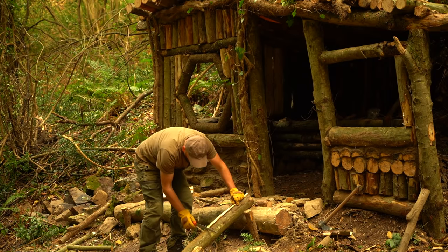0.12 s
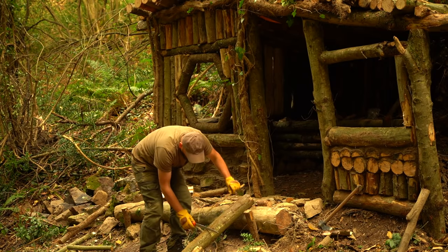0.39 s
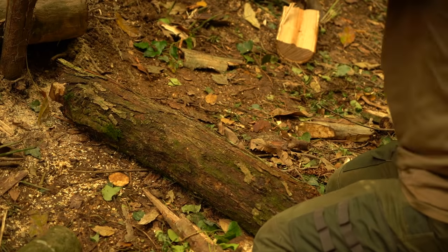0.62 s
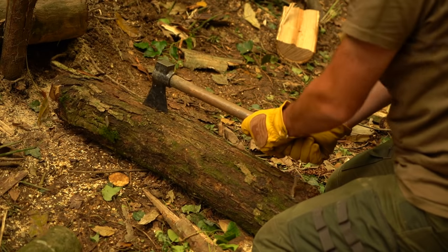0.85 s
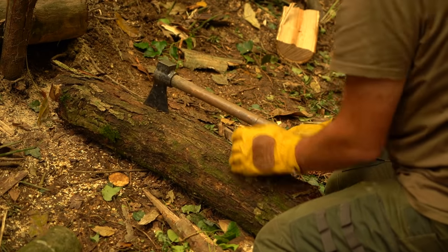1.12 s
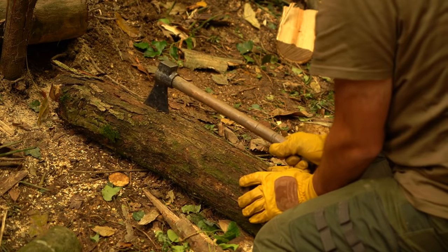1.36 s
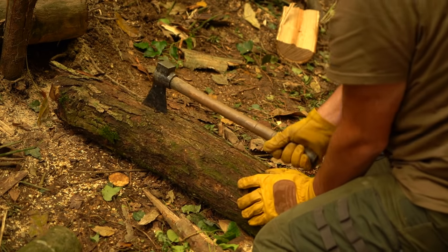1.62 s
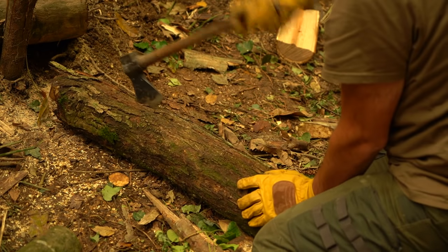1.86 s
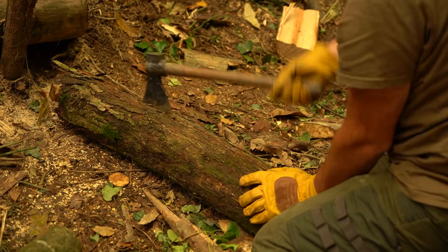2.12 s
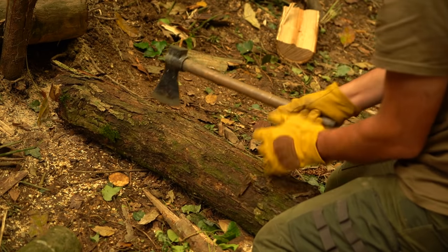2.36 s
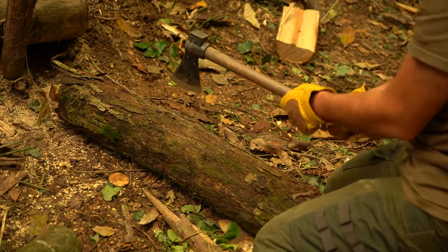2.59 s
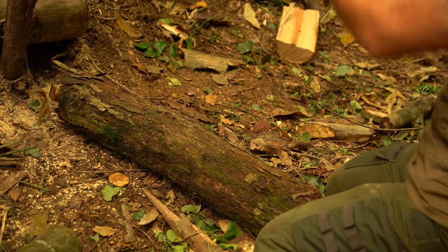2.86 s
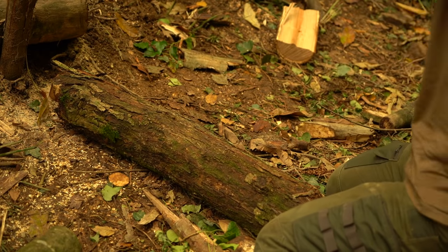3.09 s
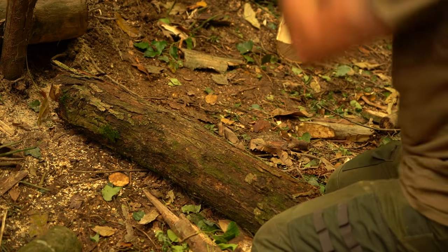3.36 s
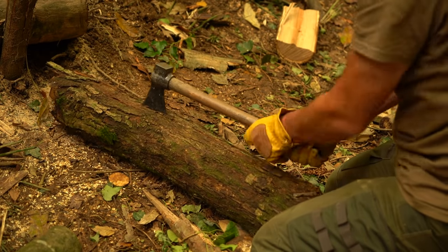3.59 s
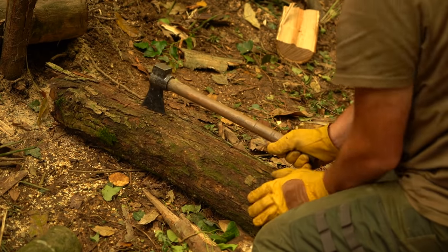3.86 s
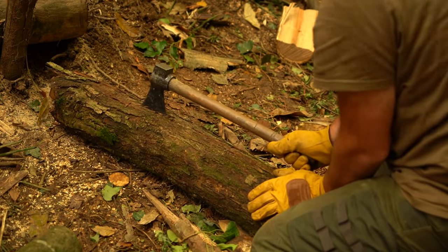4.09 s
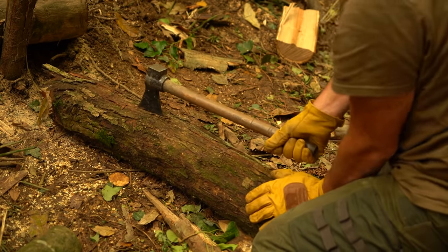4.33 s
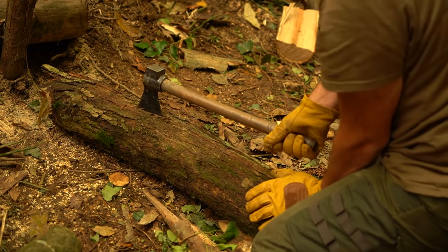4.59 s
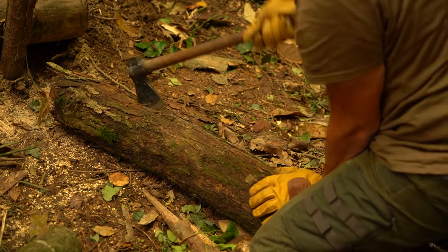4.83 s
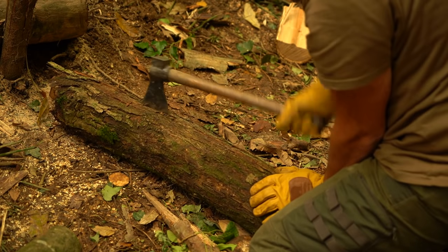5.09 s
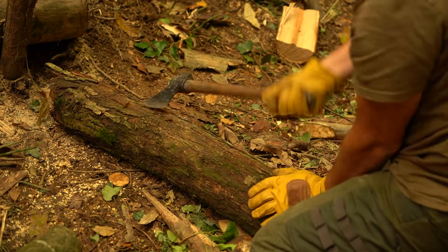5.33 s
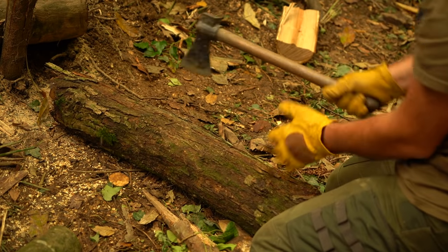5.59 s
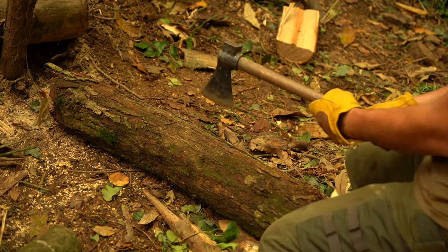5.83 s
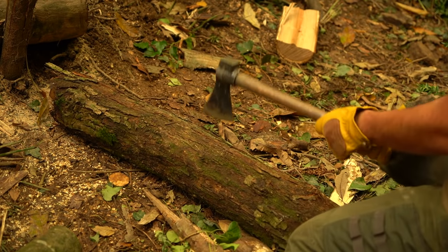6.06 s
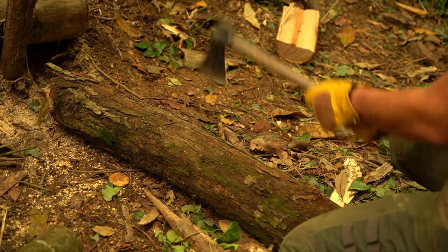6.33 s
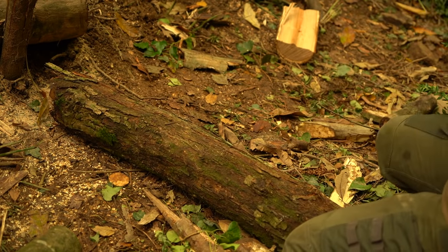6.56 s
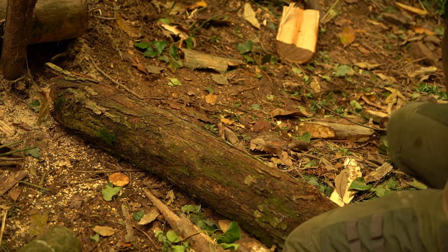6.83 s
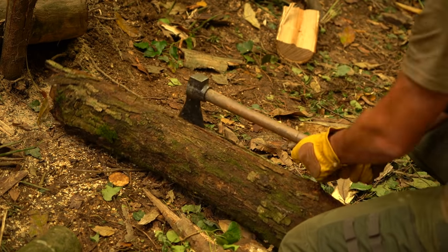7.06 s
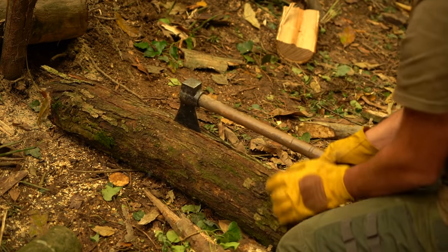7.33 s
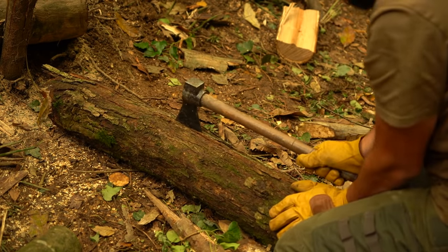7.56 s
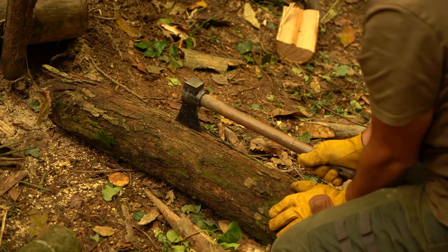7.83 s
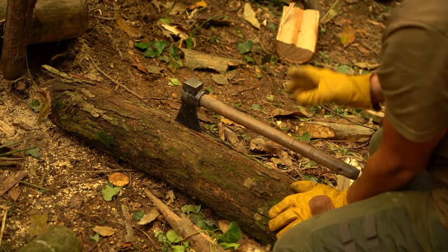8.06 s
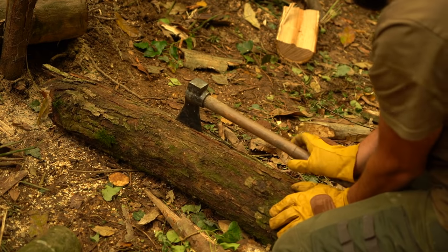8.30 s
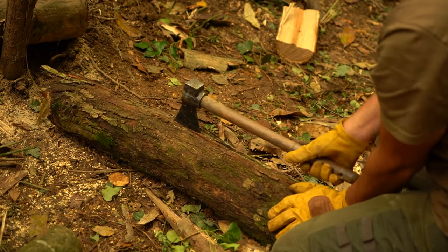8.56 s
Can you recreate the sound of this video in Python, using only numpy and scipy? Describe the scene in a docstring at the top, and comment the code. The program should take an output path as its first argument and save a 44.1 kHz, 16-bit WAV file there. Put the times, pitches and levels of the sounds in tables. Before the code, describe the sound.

A soft hush of leaves, then a heavy chop into wood with a diffuse forest echo. Small ticks and creaky snaps follow while the hatchet is loosened, amid rustling fabric and leaves. A second, more resonant chop comes, then a burst of hard knocks, then a third, drier and crack-like blow, ending with sharp knocks. Recorded close outdoors on a small, bass-thin stereo microphone with faint low rumbles.

```python
"""Three hatchet blows into a log in woodland, close to a small stereo microphone.
Each blow is a bright bite, a splitting crack and the log's ring; the trees answer with scattered noise.
Between blows the blade is worked loose: short ringing snaps and knocks, and gritty rubs of gloves.
Clothes and leaves rustle as noise that swells with the movements, over a soft hush of far leaves and air.
Low bumps and a faint rumble are band-shaped noise at the microphone."""
import sys
import numpy as np
from scipy import signal
from scipy.io import wavfile
from scipy.ndimage import uniform_filter1d

SR = 44100
rng = np.random.default_rng(int(sys.argv[2]) if len(sys.argv) > 2 else 0)


def decibels_to_gain(level_db):
    """Convert a level in decibels to a linear amplitude gain (20 dB per decade)."""
    exponent = np.asarray(level_db, float) / 20
    return 10 ** exponent


def store_wav(level_fs):
    """Save 16-bit WAV to argv[1]."""
    pcm = np.round(np.clip(np.atleast_2d(level_fs), -1, 1) * 32767)
    wavfile.write(sys.argv[1], SR, pcm.T.astype(np.int16))


N = 382788


def evened(x):
    """Scales to rms 1."""
    return x / np.sqrt(np.mean(x ** 2) + 1e-20)


def read(points, hz, axis=1):
    """Reads one column of a table along log frequency."""
    table = np.transpose(points)
    return np.interp(np.log(hz + 1), np.log(table[0] + 1), table[axis])


def add(mix, start_s, sound):
    """Mixes a stereo sound in at start_s."""
    part = mix[:, round(start_s * SR):][:, :sound.shape[1]]
    part += sound[:, :part.shape[1]]


def coloured(x, points, bright_db):
    """Minimum-phase filter with the given spectrum, tilted by bright_db per octave around 2 kHz."""
    hz = abs(np.fft.fftfreq(2048, 1 / SR))
    gain_db = read(points, hz) + bright_db * np.log2(hz / 2000 + .1)
    log_gain = np.log(decibels_to_gain(gain_db))
    taps = np.fft.ifft(np.exp(np.conj(signal.hilbert(log_gain)))).real[:512]
    return np.convolve(x, taps)[:len(x)]


# How alike the two channels hear sound from all around: [freq_hz, likeness (1 = identical)]
STEREO_LIKENESS = [(60, 0.95), (180, 1), (550, 0.79), (1650, 0.27), (4970, -0.1), (15000, 0.11)]
# Level of the left channel over the right: [freq_hz, left_over_right_db]
STEREO_LEAN = [(60, -0.5), (240, 0.5), (950, -2), (3770, -1.5), (15000, -4)]


def diffuse(field_db, size, count):
    """Stereo noise from all around, count samples; field_db(hz, s) shapes its short-time spectra."""
    hop = size // 4
    hz = np.fft.rfftfreq(size, 1 / SR)[:, None]
    s = np.arange(count // hop + 5) * hop / SR
    a, b, c, d = rng.standard_normal((len(s), len(hz), 4)).T
    left, other = a + 1j * b, c + 1j * d
    same = np.clip(read(STEREO_LIKENESS, hz), -1, 1)
    right = same * left + np.sqrt(1 - same ** 2) * other
    lean = decibels_to_gain(read(STEREO_LEAN, hz) / 2)
    spectra = np.array([left * lean, right / lean]) * decibels_to_gain(field_db(hz, s))
    return signal.istft(spectra, nperseg=size, noverlap=size - hop)[1][:, :count]


def patches(hz, s, wide, long):
    """Random unevenness over frequency and time (wide bins, long frames), rms 1."""
    field = rng.standard_normal((len(s), len(hz))).T
    over_hz = uniform_filter1d(field, wide, 0)
    return evened(uniform_filter1d(over_hz, long, 1))


def swells(s, peak_s, peak_db, rise_s, fall_s):
    """Power of each swell: 12 dB of straight climb over rise_s, 12 dB of straight drop per fall_s."""
    late = s - peak_s[:, None]
    slope = np.maximum(late / fall_s[:, None], -late / rise_s[:, None])
    return decibels_to_gain(peak_db[:, None] - 12 * slope) ** 2


# Spectrum of the distant leaves and air: [freq_hz, level_db per Hz]
HUSH_COLOUR = [(18, -61), (30, -22.5), (235, -28.5), (480, -4), (713, -2.5), (835, -2), (1270, 0),
               (1380, -1.5), (5590, -6.5), (10000, -11.5), (15200, -18), (16500, -36)]
# Its loudness, with one brief dip and then a slow rise: [time_s, level_db]
HUSH_LOUDNESS = [(0, -58), (.518, -60.5), (.527, -72), (.54, -58), (8.68, -56)]


def hush():
    """Far leaves and air: smooth noise with slow patches."""
    def field(hz, s):
        return read(HUSH_COLOUR, hz) + 0.6 * patches(hz, s, wide=14, long=14)

    level_db = np.interp(np.arange(N) / SR, *np.transpose(HUSH_LOUDNESS))
    return evened(diffuse(field, size=1024, count=N)) * decibels_to_gain(level_db)


SETTLE_S = 0.53  # the rustle enters here and the rumble's floor rises
# Low bumps at the microphone: [peak_s, rumble_db, thud_db, fall_s]
LOW_BUMPS = [(.58, -85, -101, .2), (.82, -70.5, -56, .12), (1.16, -71, -65, 0.19), (1.4, -81, -58.5, 0.2),
             (2.4, -99, -79, 0.4), (3.52, -71, -58, 0.13), (4.33, -103, -88.5, .8),
             (5.41, -92, -60.5, 0.039), (5.97, -93, -80.5, 0.73), (7.1, -77.5, -63, 0.13),
             (8.29, -80, -64, .04), (8.67, -89, -92, .15)]


def rumble():
    """Low, nearly mono noise around 60 Hz, and hollow thuds through the ground near 330 Hz."""
    peak_s, rumble_db, thud_db, fall_s = np.transpose(LOW_BUMPS)
    frames, out = np.arange(0, N, 128) / SR, np.zeros((2, N))
    rumble_floor_db = -100 - 8 * (frames < SETTLE_S)
    layers = [(60, 24, rumble_db, rumble_floor_db), (330, 11, thud_db, -91.5)]
    for centre_hz, narrow_db, peak_db, floor_db in layers:
        def field(hz, s):
            return -narrow_db * np.log2(hz / centre_hz + 0.0025) ** 2

        sound = diffuse(field, size=2048, count=N)
        bumps = swells(frames, peak_s, peak_db, 0.37 * fall_s, fall_s).sum(0)  # rises faster than it falls
        power = bumps + decibels_to_gain(floor_db) ** 2
        out += evened(sound) * np.interp(np.arange(N) / SR, frames, np.sqrt(power))
    return out


# Movements that stir clothes, gloves and leaves:
# [peak_s, peak_db, rise_s, fall_s, bright_db per octave around 1500 Hz]
MOVEMENTS = [(.72, -52.5, .3, .3, -0.5), (1.19, -48, .6, 0.35, -3), (1.304, -43.5, 0.064, 0.029, 0.5),
             (1.62, -53, 0.36, 0.35, -4.5), (1.86, -53, 0.16, 0.19, 11), (2.239, -57, 0.19, 0.16, 20),
             (2.38, -45.5, 0.12, 0.077, 0.5), (2.62, -47.5, 0.87, 0.47, -3.5),
             (3.19, -52.5, 0.4, 0.22, 0.5), (3.47, -45.5, 0.13, 0.4, 1), (3.935, -41.5, 0.053, 0.12, -1),
             (4.37, -52, 0.23, 0.48, 1.5), (4.83, -47, 0.11, 0.23, 2.5), (5.19, -48, 0.071, 0.066, 3.5),
             (5.34, -43, 0.063, 0.17, 3.5), (5.55, -54.5, 0.09, .1, -1), (5.649, -42, 0.075, 0.028, 3.5),
             (5.77, -48, 0.05, 0.1, 1.6), (6.025, -44, 0.17, 0.19, 0.9), (6.22, -49, 0.042, 0.11, 1.5),
             (6.715, -50.5, 0.24, 0.14, -0.3), (7.03, -46.5, 0.1, 0.54, 1.5), (7.42, -46, 0.35, 0.3, 0),
             (8.05, -54.5, 0.088, 0.05, 1.5), (8.281, -43.5, 0.0088, 0.12, 1),
             (8.6, -50, 0.073, 0.075, 3.5)]
# Spectrum of the rustling before that tilt: [freq_hz, level_db per Hz]
RUSTLE_SPECTRUM = [(59, -63), (100, -35), (135, -28), (166, -58), (471, -11), (1420, -3.5), (3780, -9.5),
                   (6290, -13), (16000, -30.5)]
# Spectrum of small breaks, for the crackle here and the snaps below: [freq_hz, level_db per Hz]
SNAP_COLOUR = [(120, -58), (200, -35.5), (671, -9.5), (2610, -0.5), (3250, -4.5), (3560, -5), (8580, -16.5),
               (14900, -30), (16000, -71)]


def rustle():
    """Uneven noise that follows the movements, with fine crackle of random grains riding on it."""
    peak_s, peak_db, rise_s, fall_s, bright_db = np.transpose(MOVEMENTS)
    frames = np.arange(0, N, 128) / SR
    power = swells(frames, peak_s, peak_db, rise_s, fall_s)
    total = power.sum(0)
    brightness_db = bright_db @ power / total  # the brightness is the power-weighted mean of all the movements

    def field(hz, s):
        """Colour, brightness and flicker."""
        tilt_db = np.interp(s, frames, brightness_db) * np.log2(np.maximum(hz / 1500, .6))
        flicker_db = 1.4 * patches(hz[:1], s, wide=1, long=3) + 1.63 * patches(hz, s, wide=12, long=12)
        return read(RUSTLE_SPECTRUM, hz) + tilt_db + flicker_db

    grain_db = 5.4 * np.minimum(rng.exponential(1, (2, N)), 5)
    grains = decibels_to_gain(grain_db) * (rng.random((2, N)) < 350 / SR)  # about 350 a second in each channel
    grains = grains + 0.17 * grains[::-1]  # a little of each in the other channel
    grain_shape = coloured(np.r_[1., np.zeros(300)], SNAP_COLOUR, .1)
    crackle = signal.oaconvolve(grains, grain_shape[None], axes=1)[:, :N]
    sound = evened(diffuse(field, size=256, count=N)) + decibels_to_gain(-10.5) * evened(crackle)
    envelope = np.sqrt(total) * (frames > SETTLE_S)
    return sound * np.interp(np.arange(N) / SR, frames, envelope)


# Snaps and knocks of blade, handle and bark, close by (relative levels; t60 is held to 0.004-0.12 s):
# [start_s, level_db, ring_hz, t60_s, bright_db per octave]
SNAP_EVENTS = [(0.723, -32, 1260, 0.017, -0.5), (1.199, -23, 1610, 0.019, 10),
               (1.225, -30, 6400, 0.021, 15), (1.263, -24, 2200, 0.017, 2.5),
               (1.296, -28, 1660, 0.062, -1.5), (1.461, -37.5, 1890, 0.032, 2.5),
               (1.511, -39.5, 1065, 0.022, 8), (1.725, -40, 3030, 0.023, 7.5),
               (1.781, -38.5, 2500, 0.041, 4.5), (1.808, -37.5, 1850, 0.14, 0), (1.824, -32, 1800, 0.02, 4),
               (1.8373, -22, 6370, 0.023, 7), (1.862, -32.5, 3080, 0.04, -2),
               (1.879, -33, 2770, 0.048, 2.5), (2.373, -31.5, 6100, 0.05, 6),
               (3.437, -32.5, 2000, 0.084, 1), (3.479, -25.5, 1150, 0.015, 1),
               (3.923, -30, 1430, 0.042, 1.8), (4.376, -34, 2880, 0.035, 2), (4.463, -35, 1920, 0.015, 5),
               (4.508, -36.5, 3530, 0.021, 3), (4.547, -34, 4560, 0.012, 2),
               (4.553, -28.5, 4290, 0.01, 1.5), (4.562, -33, 2040, 0.041, 3), (4.61, -37, 3250, 0.02, 6.5),
               (4.752, -37.5, 1940, 0.034, 3.5), (4.802, -31, 1740, 0.048, 4),
               (4.854, -16.5, 2130, 0.029, -1), (5.292, -32, 1720, 0.1, 1.5), (5.3103, -30, 2130, 0.031, 0),
               (5.32, -22.5, 3670, 0.033, 2.5), (5.3288, -13, 7360, 0.013, 7.5),
               (5.335, -17, 6000, 0.02, 4), (5.339, -10.5, 2840, 0.044, 3.5), (5.391, -33, 6000, 0.023, 6),
               (5.402, -13.5, 1720, 0.03, 2.5), (5.407, -17.5, 2330, 0.053, 0.8),
               (5.707, -35, 1940, 0.033, -3.5), (5.761, -29.5, 1950, 0.054, -0.2),
               (5.843, -37.5, 2060, 0.075, 5), (6.165, -38, 4000, 0.015, 5), (6.2, -29, 2600, 0.043, 1),
               (6.207, -19, 1760, 0.026, 1), (6.352, -36.5, 2520, 0.025, -3.5),
               (6.375, -41, 2090, 0.03, -4), (6.392, -38.5, 2160, 0.04, -2.5),
               (7.475, -28, 1874, 0.093, -1.2), (7.486, -37, 2300, 0.03, 2.5),
               (7.716, -29, 2720, 0.027, -2.8), (7.851, -33, 1580, 0.031, -5),
               (8.273, -9, 1710, 0.023, -5.5), (8.275, -10.5, 1790, 0.011, 3.2),
               (8.283, -8.5, 2100, 0.042, -3), (8.304, -23, 3000, 0.026, 1), (8.323, -31, 3060, 0.033, 2),
               (8.591, -30, 1940, 0.07, -1.5), (8.671, -9.5, 1810, 0.019, 2.5)]


def snap(db, hz, t60, bright_db):
    """A sharp tick, a splintery tail, and the small ring of whatever gave way."""
    t = np.arange(4096) / SR
    fade = decibels_to_gain(-60 * t / np.clip(t60, .004, .12))
    grit = decibels_to_gain(2.76 * np.repeat(rng.standard_normal(len(t) // 32), 32))  # it breaks unevenly
    splinters = rng.standard_normal((2, len(t))) * fade * grit
    splinters[1] = 0.62 * splinters[0] + 0.41 * splinters[1]
    splinters[:, :10] *= 1.8  # the first tick
    wide = np.array([coloured(v, SNAP_COLOUR, bright_db) for v in splinters])
    wide = wide * fade ** 0.13  # the broad noise dies a little sooner
    r = np.exp(-np.pi * .15 * hz / SR)  # resonance about 0.15 of its pitch wide
    ring = signal.lfilter([1], [1, -2 * r * np.cos(2 * np.pi * hz / SR), r * r], splinters)
    sound = evened(evened(wide) + decibels_to_gain(-4.0) * evened(ring)) * np.sqrt(np.mean(fade ** 2))
    pan_db = -3.5 + 0.0444 * (db + 10)  # left over right: fainter ones lie further right
    return decibels_to_gain(db) * sound * decibels_to_gain(np.array([[pan_db], [-pan_db]]) / 2) * 0.42


# Hatchet blows near the microphone (relative levels); ring_db is the log's ring against the crack:
# [start_s, level_db, pitch_hz, ring_db, bite_s]
CHOP_EVENTS = [(0.7946, -1.5, 1177, -4.5, 0.0012), (3.5008, -2.5, 1107, 3, 0.0024),
               (7.05, -1, 1120, -24, 0.0021)]
# Echo of each blow: [level_db, bright_db per octave, length_factor]
CHOP_ECHOES = [(11, 2, 0.97), (12.5, 1.52, 1.244), (15, 1.73, 1.16)]
# What the log rings with: [ratio to its pitch, level_db, t60_s]
LOG_MODES = [(0.449, -0.5, 0.092), (.8, -36, 0.034), (1.004, 10.5, 0.019), (1.12, -1, 0.021),
             (1.305, 4, 0.023), (1.6, 5.5, 0.013), (1.85, -11, .02)]
# Fibres splitting: [freq_hz, level_db per Hz]
CRACK_COLOUR = [(120, -18), (200, 4.5), (1060, 1), (1620, 0.5), (5330, -10.5), (7010, -12.5), (8740, -18),
                (14100, -30), (16000, -34)]
# The steel edge entering, heard close: [freq_hz, level_db per Hz]
STEEL_EDGE = [(300, -5.5), (1000, 2.5), (2000, 4.5), (3500, 1.5), (5500, -3.5), (8000, -7), (12000, -15.5),
              (16000, -22)]
# Echo from the trees, before each blow's own tilt and length; treble comes from far trunks, so late:
# [freq_hz, colour_db, t60_s, build_up_s]
TREE_ECHO = [(147, -16.5, 0.75, 0.0032), (500, -4.5, 0.65, 0.00073), (1156, 5.5, 0.66, 0.003),
             (2070, -0.5, 0.77, 0.037), (4170, 3.5, 0.59, 0.044), (7500, 6, 0.52, 0.044),
             (14900, 5, 0.41, 0.04)]


def chop(db, pitch_hz, ring_db, bite_s, echo_db, bright_db, length):
    """A short splitting crack and the ring of the log; the trees scatter the blow back."""
    t = np.arange(SR // 10) / SR
    crack = coloured(1. * (t == 0), CRACK_COLOUR, 0)
    ring = 0
    for ratio, mode_db, t60 in LOG_MODES:
        ring = ring + decibels_to_gain(mode_db - 60 * t / t60) * np.sin(2 * np.pi * ratio * pitch_hz * t)
    wood = crack / np.linalg.norm(crack) + decibels_to_gain(ring_db) * ring / np.linalg.norm(ring)

    # splitting drops 6 dB during the bite, then stops fast
    splits = decibels_to_gain(-60 * np.maximum(t - bite_s, 0) / 0.0011) * decibels_to_gain(-6 * t / bite_s)
    debris = decibels_to_gain(-17 - 60 * t / 0.092)  # chips and bark settle
    noise = rng.standard_normal(len(t))
    bite = noise * splits + 2 * uniform_filter1d(noise, size=6) * debris  # the debris is duller
    edge = evened(coloured(bite, STEEL_EDGE, 0))  # bright and first

    push_count = round(bite_s * SR) + 20
    push = signal.windows.hann(push_count) * np.cos(2 * np.pi * pitch_hz * t[:push_count])
    delayed = np.r_[np.zeros(round(.0005 * SR)), push]  # the log answers a moment later
    thump = evened(np.convolve(wood, delayed)[:len(t)])
    blow = edge + decibels_to_gain(-4.0) * thump

    def echo(hz, s):
        """Builds up and dies band by band; single trunks give lumps."""
        build = np.clip((s - .002) / read(TREE_ECHO, hz, axis=3), 1e-2, 1) ** 1.4
        linger = 1 + 0.2 * np.exp(-((hz - pitch_hz) / 150) ** 2)  # the log's own pitch is held longer
        fade_db = -60 * s / (length * linger * read(TREE_ECHO, hz, axis=2))
        lumps_db = 0.37 * patches(hz[:1], s, wide=1, long=3) + 0.42 * patches(hz, s, wide=9, long=4)
        colour_db = read(TREE_ECHO, hz) + bright_db * np.log2(hz / 1000 + 0.17)
        return colour_db + 20 * np.log10(build) + fade_db + lumps_db

    trees = diffuse(echo, size=256, count=SR)
    trees /= np.linalg.norm(trees[0])
    out = decibels_to_gain(echo_db) * signal.fftconvolve(wood[None], trees, axes=1)[:, :SR]
    out[:, :len(t)] += 3.64 * blow / np.linalg.norm(blow)
    return decibels_to_gain(db) * out


# Gloves sliding on handle and bark: [start_s, length_s, level_db (rms before fades), centre_hz, width_hz]
GLOVE_RUBS = [(2.329, 0.43, -53.5, 1360, 500), (4.763, .09, -53.5, 1720, 400),
              (5.144, 0.12, -49, 1910, 1200), (5.959, .13, -52.5, 1360, 604),
              (7.944, 0.21, -57.5, 1320, 600)]


def rub(length, db, hz, width_hz):
    """Gritty noise in one broad resonance, swelling and fading."""
    count = round(length * SR)
    grit = decibels_to_gain(1.1 * np.repeat(rng.standard_normal(count // 128 + 1), 128)[:count])
    noise = rng.standard_normal((2, count)) * grit
    band = signal.butter(2, [hz - width_hz / 2, hz + width_hz / 2], "band", fs=SR, output="sos")
    sound = signal.sosfilt(band, noise + .5 * noise[::-1])
    return decibels_to_gain(db) * evened(sound) * signal.windows.tukey(count, .7)


def scene():
    """Blows, snaps and rubs over the woodland bed; the rumble arises at the microphone itself."""
    near = rustle()
    for start_s, *row in SNAP_EVENTS:
        add(near, start_s, snap(*row))
    for (start_s, *blow), echo in zip(CHOP_EVENTS, CHOP_ECHOES):
        add(near, start_s, chop(*blow, *echo))
    for start_s, *row in GLOVE_RUBS:
        add(near, start_s, rub(*row))
    low_cut = signal.butter(4, 340, "high", fs=SR, output="sos")  # the small microphone drops the bass
    return signal.sosfilt(low_cut, near) + hush() + rumble()


def roll_off(x):
    """The treble ends steeply here."""
    return signal.sosfilt(signal.butter(12, 16890, fs=SR, output="sos"), x)


def record(dry):
    """Takes off the treble above 16.4 kHz with a steep low-pass."""
    low_pass = signal.firwin(255, 16400, window=("kaiser", 9), fs=SR)
    mix = signal.oaconvolve(dry, low_pass[None], "same")
    return roll_off(mix)


dry = scene()
out = record(dry)
store_wav(out)
```